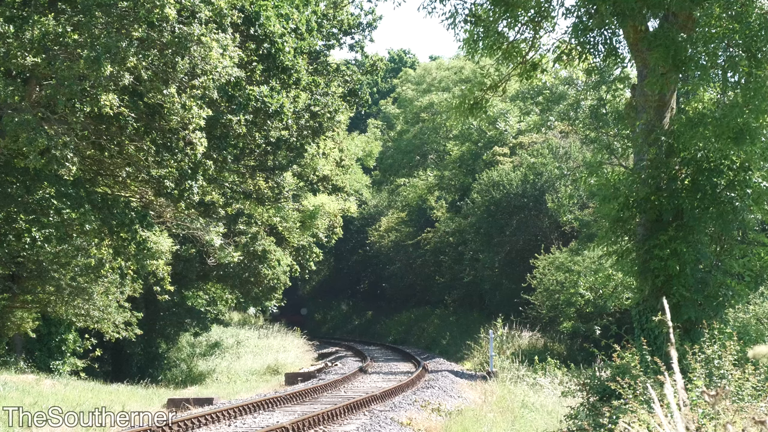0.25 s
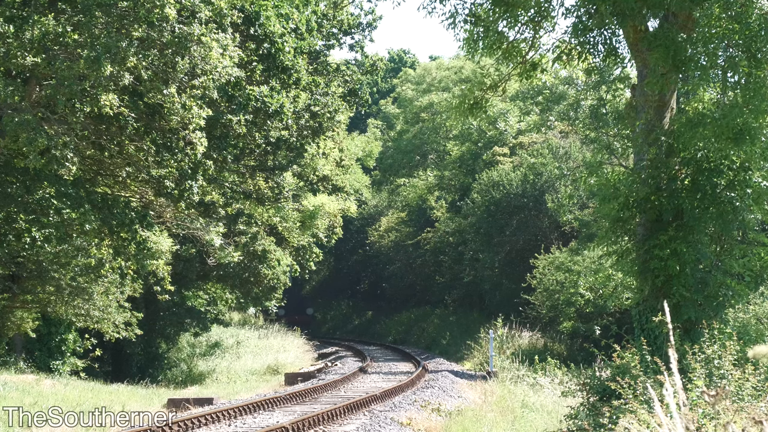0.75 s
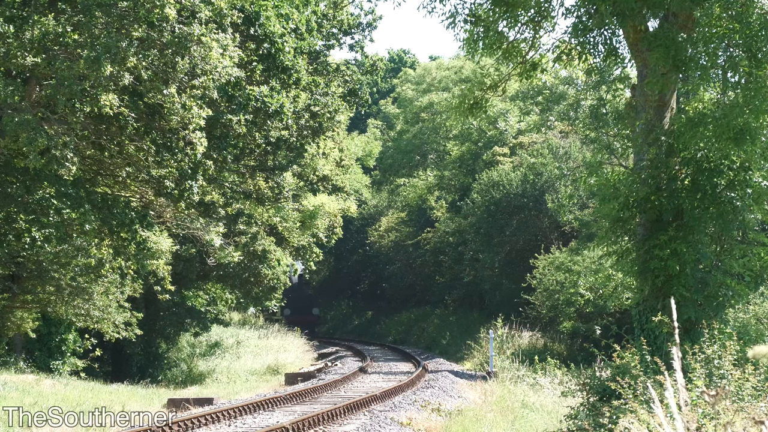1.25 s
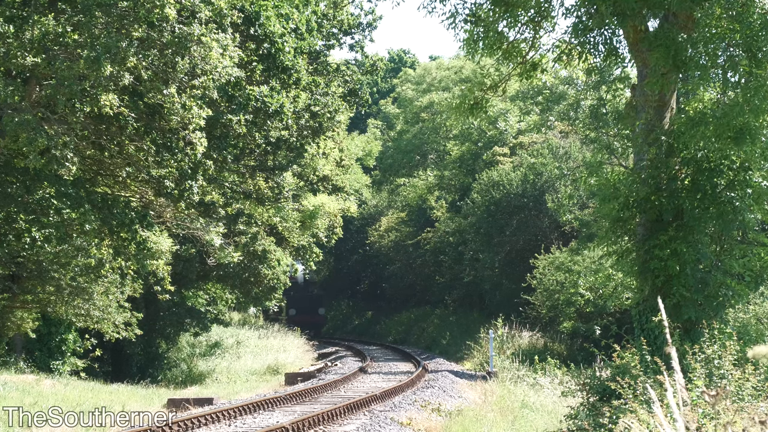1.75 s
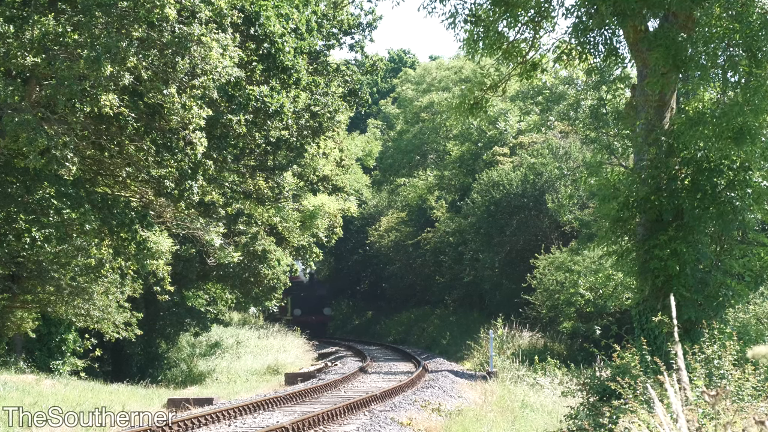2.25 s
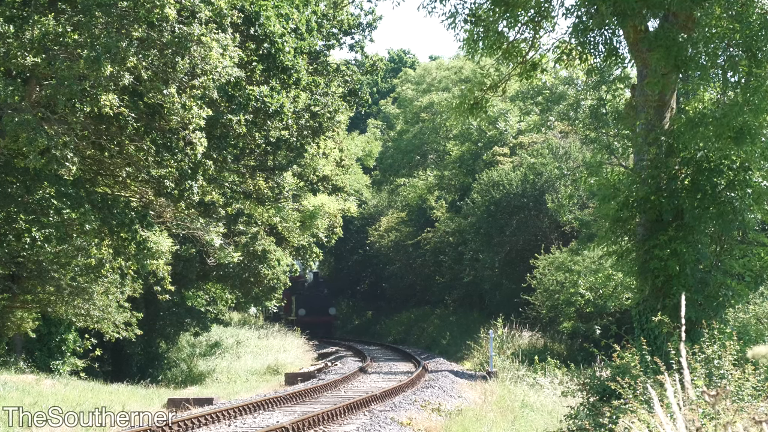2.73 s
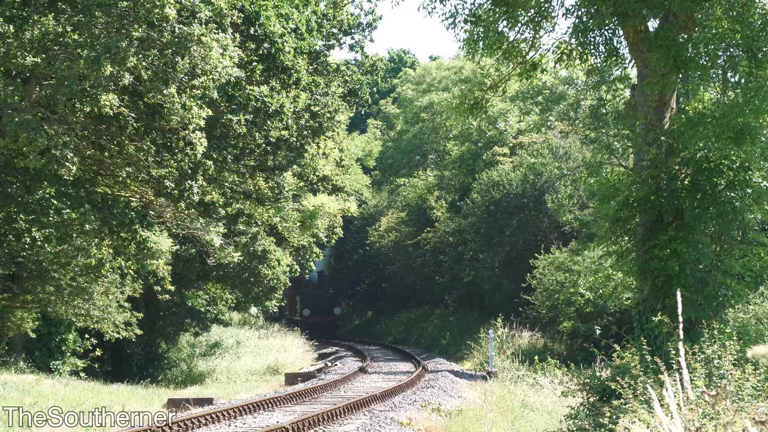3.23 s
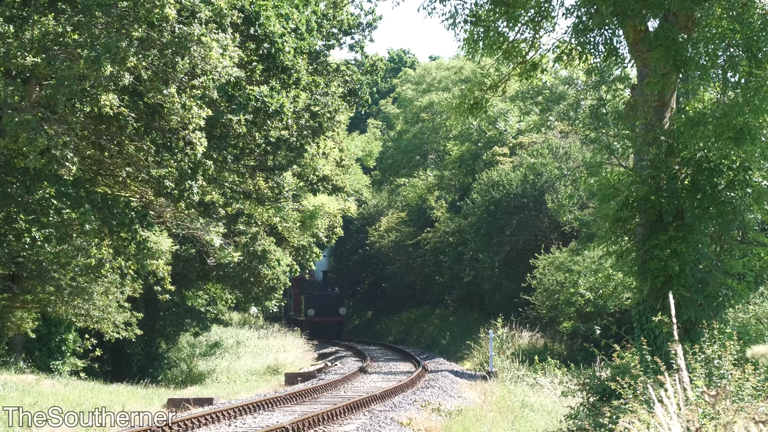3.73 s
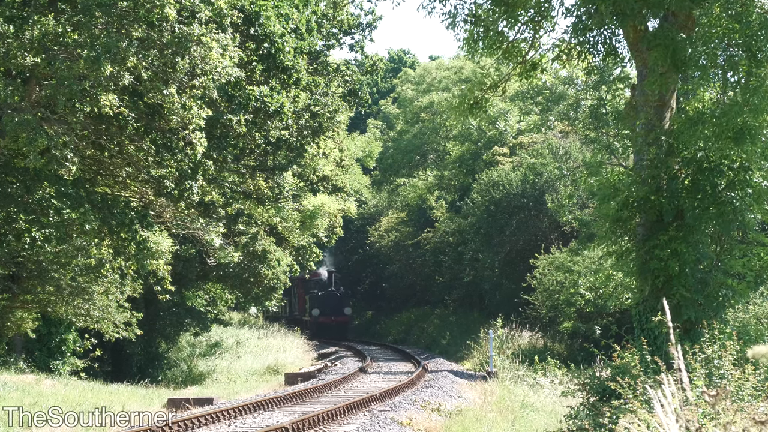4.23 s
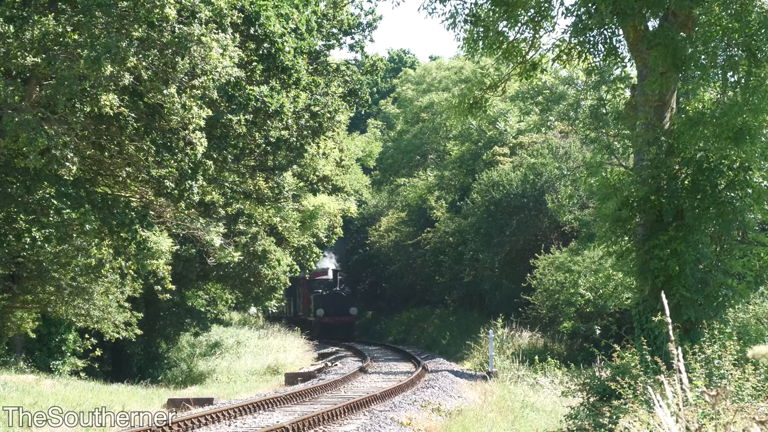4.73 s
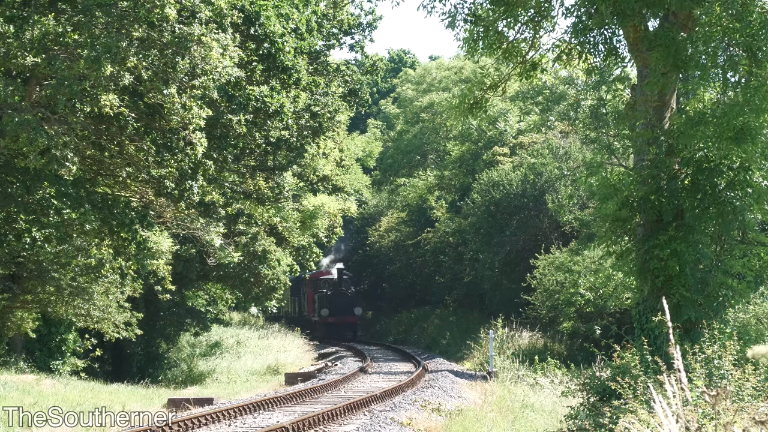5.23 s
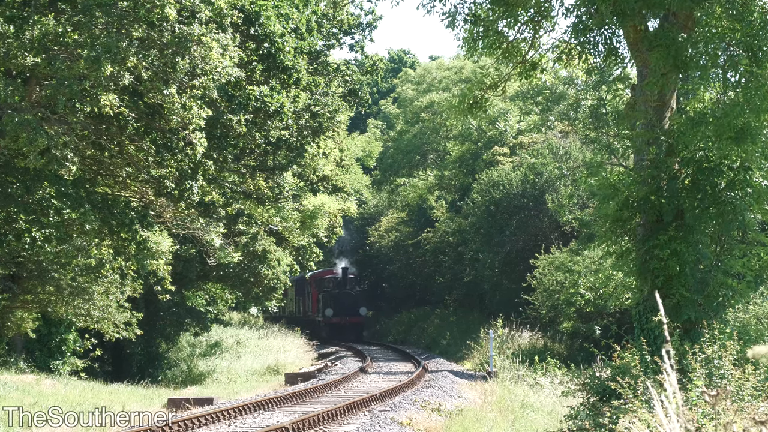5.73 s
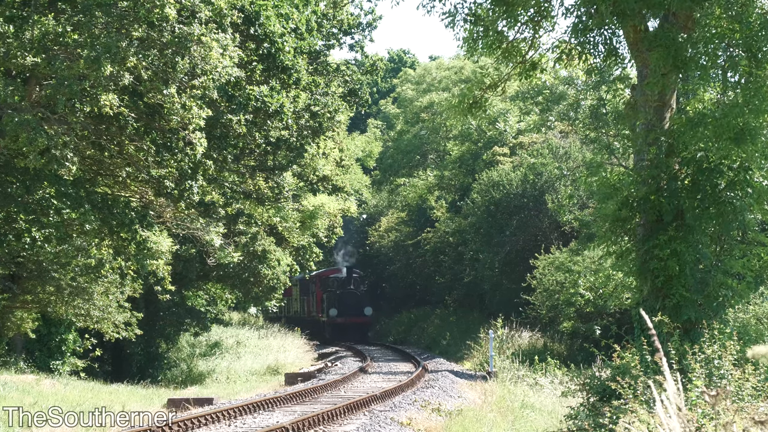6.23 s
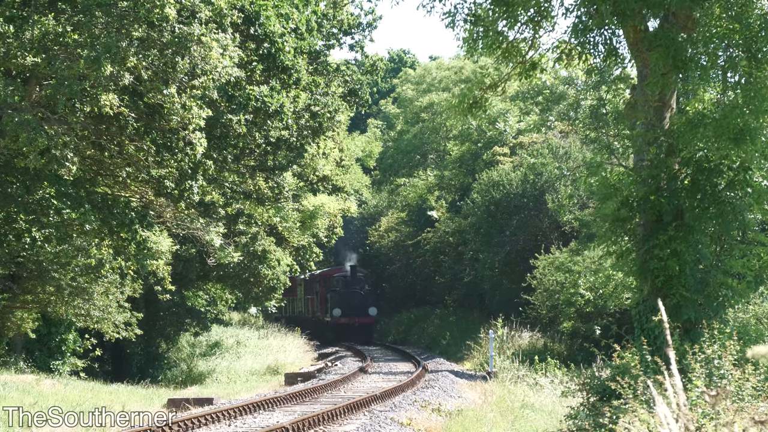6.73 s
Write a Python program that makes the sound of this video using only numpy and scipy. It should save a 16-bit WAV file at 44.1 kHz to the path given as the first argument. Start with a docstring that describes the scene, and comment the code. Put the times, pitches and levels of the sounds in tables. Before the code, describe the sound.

One long steam whistle blast and a quick toot from an approaching train ring off the trees and fade into quiet country air.

```python
"""Steam whistle in wooded country

A steam locomotive rolling nearer blows a long blast and a short toot: a steam jet sounds a resonant pipe.
Trees and far banks return the note late and a little flat, since the engine draws away from them
(the Doppler effect). Around it are quiet country air, a low hum, a few dry snaps and ticks and,
toward the end, faint bird chirps and the growing hiss of the engine."""
import sys
import numpy as np
from scipy import signal
from scipy.io import wavfile

SR = 44100
rng = np.random.default_rng(int(sys.argv[2]) if len(sys.argv) > 2 else 0)


def unload_audio(sound):
    """Save the sound as a 16-bit wav file, at the path given as the first command line argument."""
    columns = np.transpose(np.atleast_2d(sound))
    # keep every value between -1 and 1, then stretch to whole-number steps
    steps = np.round(np.clip(columns, -1, 1) * 32767)
    wavfile.write(sys.argv[1], SR, steps.astype(np.int16))


N = 307542
T = np.arange(N) / SR

# country air: (frequency [Hz], relative spectral density [dB])
AIR_SPECTRUM = [(20, -12.5), (32, -26.5), (64, -12), (97, -19), (180, -24), (292, -16.5), (400, -17),
                (900, -18), (2500, -26.5), (6000, -32), (10000, -28.5), (13000, -37), (15700, -24.5)]
# country air: (time [s], rms level [dB])
AIR_LOUDNESS = [(0, -59), (3, -58.5), (5.5, -58), (7, -58.5)]
# country air: (frequency [Hz], left-right correlation [ratio])
AIR_COHERENCE = [(60, 1), (180, 0.81), (550, 0.61), (1650, 0.98), (4970, 0.13), (15000, 0.1)]
# noise bands of the hum: (centre [Hz], bandwidth [Hz], base level [dB])
HUM_BANDS = [(63, 11, -77.5), (175, 4.6, -79.5)]
# swell of the hum: (time [s], gain [dB])
HUM_GAIN = [(0, -6.5), (1.4, 5), (2, -1.5), (3.3, -0.5), (4.2, -10.5), (5.2, -1), (7, -5.5)]
# whistle valve: (opens [s], shuts [s], pressure time constant [s])
VALVE_OPENINGS = [(1.072, 4.062, .015), (4.199, 4.385, .009)]
# fundamental at full pressure: (time [s], frequency [Hz])
PIPE_PITCH = [(1.12, 946.3), (1.31, 963), (1.44, 955), (2.58, 956.2), (3.91, 957.9), (4.05, 954),
              (4.36, 964.8)]
# harmonics by path: (multiple [1], direct gain [dB], to near trunks [dB], to far trees and banks [dB])
HARMONICS = [(1, 2, 0.5, 3), (2, 1, -10, -19.5), (3, -29, -7, -19), (4, -33, -17, -27),
             (5, -42.5, -27, -36), (6, -48, -31, -41.5), (7, -60, -40, -50.5), (8, -63, -44.5, -54.5)]
# direct path as the air and the cutting change, a list each for blast and toot: (time [s], base level [dB])
DIRECT_LEVEL = [
    [(1.09, -34), (1.12, -30), (1.49, -27.5), (1.57, -23.5), (1.93, -26), (2.17, -21), (2.35, -28),
     (2.4, -21.5), (2.86, -22), (2.89, -21), (3.17, -24.5), (3.32, -21), (3.52, -27.5), (3.56, -23.5),
     (4.01, -27.5), (4.04, -30)],
    [(4.22, -33.5), (4.246, -29), (4.36, -32.5)],
]
# second harmonic on the direct path: (time [s], base level [dB])
OCTAVE_LEVEL = [(1.1, -51.5), (1.24, -46.5), (1.34, -54.5), (2.41, -42.5), (2.43, -53), (2.82, -43),
                (2.86, -52), (2.96, -40), (3.53, -48), (3.81, -38), (3.86, -53), (4.04, -41.5), (4.1, -58),
                (4.36, -43.5)]
# steam jet: (frequency [Hz], relative spectral density [dB])
JET_SPECTRUM = [(500, -17), (700, -12.5), (850, 9.5), (1100, -6.5), (1500, -6.5), (2600, -6.5), (4200, -9),
                (5200, -17), (7000, -18.5), (9500, -32)]
# far banks: (delay at ECHO_REF_S [s], delay growth [s/s], base gain [dB], left minus right [dB])
BANK_ECHOES = [(0.172, 0.018, -45, 0.5), (.585, 0.0022, -48, 1), (.60, 0.026, -51.5, -5),
               (1.0, 0.024, -62, 3), (1.565, .025, -50, 21.5), (1.4, .003, -60, 3)]
# swelling and fading of the far echoes: (time [s], gain [dB])
FAR_GAIN = [(4.0, -20), (4.19, -4), (4.35, -13), (4.5, -3.5), (4.75, -13.5), (4.83, -6.5), (5.02, -11.5),
            (5.2, -11), (5.4, -18.5), (5.62, -8.5), (5.9, -19)]
# dry snaps: (time [s], peak before panning [dB], length [s], low edge [Hz], high edge [Hz],
# left minus right [dB])
SNAP_BURSTS = [(1.6715, -42, .0008, 5000, 11000, 4), (1.683, -20, .0036, 4000, 15000, 6),
               (2.8012, -28, .0022, 6500, 12500, 1), (4.72, -45, .002, 1000, 2800, 0)]
# ringing ticks: (time [s], peak [dB])
TICK_STRIKES = [(1.9969, -40.5), (2.004, -47)]
# bird chirps: (time [s], length [s], start pitch [Hz], end pitch [Hz], peak [dB])
BIRD_GLIDES = [(4.868, .035, 4302, 5655, -67), (4.992, 0.022, 5700, 6795, -64),
               (5.595, 0.023, 4060, 4460, -71), (5.696, 0.026, 3900, 4480, -66),
               (6.148, .035, 3530, 5900, -62), (6.278, .018, 6000, 6600, -64)]
# engine hiss growing out of the trees: (time [s], base level [dB])
HISS_LEVEL = [(4.5, -85), (5.5, -85), (6.3, -72.5), (7, -68.5)]

SINCE_OPEN = T - VALVE_OPENINGS[0][0]
ECHO_REF_S = 4.2   # moment at which the bank and cutting-wall delays hold
ABSORPTION_HZ = 2380   # treble cut-off of an echo one second late


def from_db(db):
    """Amplitude ratio of a level in decibels."""
    return 10 ** (np.asarray(db) / 20)


def unit_rms(x):
    """Normalisation to an rms of 1."""
    return x / np.sqrt(np.mean(x ** 2) + 1e-20)


def in_time(rows):
    """Linear interpolation of (time, value) rows at every sample."""
    return np.interp(T, *np.transpose(rows))


def at_hz(rows, hz):
    """Interpolation on a logarithmic frequency axis."""
    frequencies, values = np.transpose(rows)
    return np.interp(np.log(hz), np.log(frequencies), values)


def drift(rate_hz):
    """Slow random fluctuation: low-passed noise of rms about 1."""
    step = 40   # samples per noise value
    pole = np.exp(-2 * np.pi * step * rate_hz / SR)
    slow = signal.lfilter([1], [1, -2 * pole, pole ** 2], rng.standard_normal(N // step + 2002))[2000:]
    return np.interp(np.arange(N) / step, np.arange(len(slow)), unit_rms(slow))


def relax(x, tau_s):
    """First-order lag: the output approaches x exponentially."""
    rate = 1 / (tau_s * SR)
    return signal.lfilter([rate], [1, rate - 1], x)


def bandpass(x, low_hz, high_hz, order):
    """Butterworth filtering to one band."""
    return signal.sosfilt(signal.butter(order, [low_hz, high_hz], "band", fs=SR, output="sos"), x)


def panned(x, pan_db):
    """Direction from a level difference, left minus right."""
    return x * from_db([[pan_db / 2], [-pan_db / 2]])


def noise_band(low_hz, high_hz):
    """Partly coherent stereo noise: a common signal plus a weaker one in antiphase."""
    mid, side = unit_rms(bandpass(rng.standard_normal((2, N)), low_hz, high_hz, order=1))
    return mid + .4 * side * [[1], [-1]]


def shaped_noise(spectrum, coherence, flicker_db):
    """Superposed half-octave noise bands, each with its own level, flicker and coherence; rms 1."""
    out, edges = 0, 20 * 2 ** np.arange(0, 10.1, .5)
    white = rng.standard_normal((2, 2, N))
    for k, (low, high) in enumerate(zip(edges, edges[1:])):
        mid, side = bandpass(white[k % 2], low, high, order=2)
        hz = np.sqrt(low * high)
        alike = at_hz(coherence, hz)
        gain = from_db(at_hz(spectrum, hz) + flicker_db * drift(30))
        out += gain * (np.sqrt(1 + alike) * mid + np.sqrt(1 - alike) * side * [[1], [-1]])
    return unit_rms(out)


def country_air():
    """Broadband ambient noise, its channels nearly incoherent in the high treble."""
    return from_db(in_time(AIR_LOUDNESS)) * shaped_noise(AIR_SPECTRUM, AIR_COHERENCE, flicker_db=0.84)


def hum(drone_hz=130.5, drone_db=-69):
    """Narrow-band noise wavers as its components beat; a steadier tone swells with it."""
    bands = sum(from_db(level_db) * noise_band(hz - width / 2, hz + width / 2)
                for hz, width, level_db in HUM_BANDS)
    phase = 2 * np.pi * np.cumsum(drone_hz * (1 + 0.0068 * drift(1.5))) / SR
    drone = np.sin([phase + 0.58, phase - .6]) * from_db(drone_db + 2.0 * drift(3.8))
    return (bands + drone) * from_db(in_time(HUM_GAIN))


def steam_pressure(fall_s=0.0199):
    """Driving pressure, 0 to 1: an exponential rise as the valve opens, a linear fall as it shuts."""
    return sum((1 - np.exp(-np.clip(T - opens, 0, None) / rise_s)) * np.clip((shuts - T) / fall_s, 0, 1)
               for opens, shuts, rise_s in VALVE_OPENINGS)


def whistle(steam, pitch_sag=0.14, bark_db=4.5):
    """Pipe resonance radiates harmonics ahead, aside and behind; low pressure flattens and dulls them."""
    hz = in_time(PIPE_PITCH) * (1 - pitch_sag * (1 - steam) + 0.0013 * drift(31))
    phase = 2 * np.pi * np.cumsum(hz) / SR
    speaking = np.sin(np.pi / 2 * np.clip(steam / 0.61, 0, 1)) ** 2   # the pipe needs pressure to sound
    blast, toot = DIRECT_LEVEL
    level_db = in_time(blast + toot) + bark_db * 4 * steam * (1 - steam)   # barks at half pressure
    octave_db = in_time(OCTAVE_LEVEL)
    pan_db = 1 - 0.4 * SINCE_OPEN + 0.9 * drift(5)   # the engine drifts right round the curve
    clearing = from_db(-0.22 + 0.4663 * SINCE_OPEN)   # overtones clear as it leaves the trees
    ahead = aside = behind = 0
    for k, ahead_db, aside_db, behind_db in HARMONICS:
        jitter = 0.26 * (k - 1) * drift(17.3)
        tone = np.sqrt(2) * np.sin(k * phase + jitter) * speaking * (steam * clearing ** (1 / 1.1)) ** (
            1.1 * (k - 1))
        flutter_db = (.8 if k == 1 else 3.0) * drift(16.4)
        ahead += tone * from_db(ahead_db + flutter_db + (octave_db if k == 2 else level_db))
        aside += tone * from_db(aside_db)
        behind += tone * from_db(behind_db) * steam   # weak notes do not carry far
    return ahead * from_db([pan_db / 2, -pan_db / 2]), aside, behind


def steam_jet(steam, rise_s=0.023, linger_s=.12):
    """Turbulence at the whistle lip: noise that builds more slowly than the note and lingers in the trees."""
    built = np.minimum(steam, relax(steam, rise_s))
    envelope = np.sqrt(0.51 * built ** 2 + 0.092 * relax(steam ** 2, linger_s))
    gain = from_db(-51.5 + 0.74 * SINCE_OPEN)   # grows as the engine nears
    return envelope * gain * shaped_noise(JET_SPECTRUM, [(500, 0.91), (9000, 1.0)], flicker_db=2.0)


def echo(x, lag, absorption_s):
    """Doppler effect: a growing lag flattens the pitch. Travel through air for absorption_s dulls it."""
    cutoff_hz = min(ABSORPTION_HZ / np.sqrt(absorption_s), 15000)
    pole = np.exp(-2 * np.pi * cutoff_hz / SR)
    return signal.lfilter([1 - pole], [1, -pole], np.interp(T - lag, T, x, left=0))


def trunks(x, count, first_s, spread_s, max_slip, base_db, t60_s):
    """Scattering: each path lengthens at its own rate, fades out and passes to the next trunk."""
    golden = (np.sqrt(5) - 1) / 2   # spreads the trunks evenly in depth
    out = 0
    for k, (nudge, bearing) in enumerate(rng.random((count, 2))):
        turn = (k + .5) / count   # paths turned furthest back are flattest and weakest
        slip = max_slip * turn ** 1.2   # fraction of pitch lost
        depth = (k * golden + nudge / 4 + slip * T / spread_s) % 1
        lag = first_s + spread_s * depth
        fade = np.clip(30 * np.minimum(depth, 1 - depth), 0, 1)
        gain = fade * from_db(base_db - 10 * turn - 60 * lag / t60_s + 3.72 * drift(3.86))
        out += panned(echo(x, lag, lag[-1]) * gain, pan_db=5 * (2 * bearing - 1))
    return out


def reflector(x, delay_s, slip, gain_db, pan_db, waver_db, waver_hz):
    """Reflection from a receding surface: one unsteady copy, flat by the fraction slip."""
    lag = delay_s + slip * (T - ECHO_REF_S)
    gain = from_db(gain_db + waver_db * drift(waver_hz))
    return panned(echo(x, lag, delay_s) * gain, pan_db)


def landscape(aside, behind):
    """Multipath propagation: banks and the wall of a railway cutting echo; near trunks smear, far ones
    reverberate."""
    banks = sum(reflector(behind, *bank, waver_db=2.0, waver_hz=27) for bank in BANK_ECHOES)
    cutting_wall = reflector(behind, delay_s=.115, slip=0.034, gain_db=-43, pan_db=1.5, waver_db=3, waver_hz=13)
    near = trunks(aside, count=40, first_s=.003, spread_s=.2, max_slip=.034, base_db=-39, t60_s=0.29)
    far = trunks(behind, count=30, first_s=.1, spread_s=0.97, max_slip=0.035, base_db=-38.5, t60_s=2.84)
    return cutting_wall + near + (banks + far) * from_db(in_time(FAR_GAIN))


def snaps(tail_s=.004):
    """Broadband transients: noise bursts with an exponential tail, partly coherent between channels."""
    out = np.zeros((2, N))
    t = np.arange(SR // 20) / SR
    for onset_s, peak_db, length_s, low_hz, high_hz, pan_db in SNAP_BURSTS:
        envelope = np.exp(-(t / length_s) ** 4) + 0.51 * np.exp(-t / tail_s)
        noise = rng.standard_normal(len(t)) + 0.68 * rng.standard_normal((2, len(t)))
        burst = bandpass(noise * envelope, low_hz, high_hz, order=2)
        start = round(onset_s * SR)
        out[:, start:start + len(t)] += panned(burst / np.abs(burst).max() * from_db(peak_db), pan_db)
    return out


def ticks(mode_hz=10040, t60_s=0.013):
    """Damped free vibration of one high mode, struck twice."""
    out = 0
    for onset_s, peak_db in TICK_STRIKES:
        age = np.clip(T - onset_s, 0, 1)
        out += from_db(peak_db - 60 * age / t60_s) * np.sin(2 * np.pi * mode_hz * age)
    return out


def birds():
    """Frequency modulation: each chirp is a pure tone gliding upward under a half-sine envelope."""
    out = 0
    for onset_s, length_s, from_hz, to_hz, peak_db in BIRD_GLIDES:
        progress = np.clip((T - onset_s) / length_s, 0, 1)
        phase = 2 * np.pi * np.cumsum(from_hz + (to_hz - from_hz) * progress) / SR
        out += from_db(peak_db) * np.sin(np.pi * progress) * np.sin(phase)
    return out


def engine_hiss():
    """Distant steam noise; random amplitude modulation makes it puff lightly."""
    return noise_band(low_hz=1800, high_hz=7500) * from_db(in_time(HISS_LEVEL) + 3.0 * drift(5))


def scene():
    """Superposition of the direct whistle, its echoes, the steam noise and the countryside."""
    steam = steam_pressure()
    direct, aside, behind = whistle(steam)
    air = country_air()
    train = direct + engine_hiss() + landscape(aside, behind) + steam_jet(steam)
    return train + air + hum() + snaps() + ticks() + birds()


def record(dry, stopband_hz=15950, offset=.0106):
    """Steep low-pass filtering removes the highest treble; a small constant offset is added."""
    return signal.sosfilt(signal.cheby2(20, 60, stopband_hz, fs=SR, output="sos"), dry) + offset


dry = scene()
out = record(dry)
unload_audio(out)
```